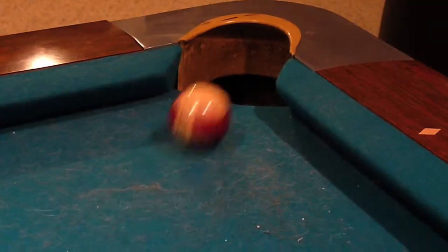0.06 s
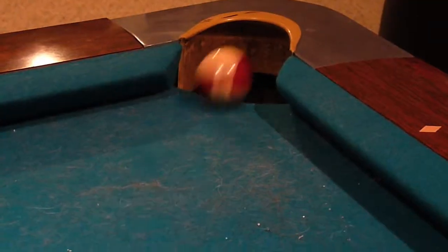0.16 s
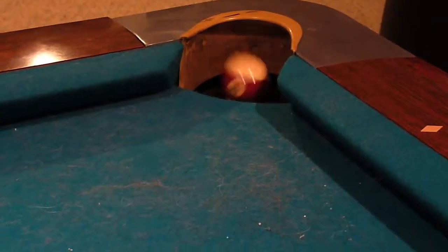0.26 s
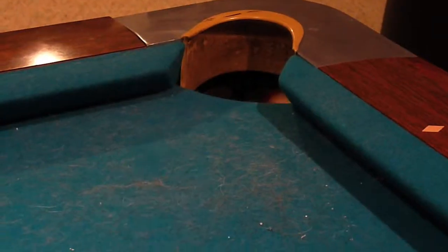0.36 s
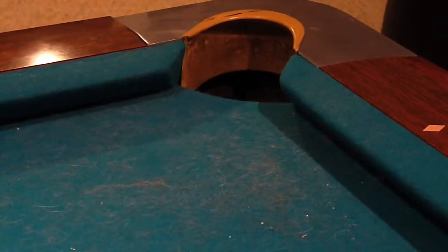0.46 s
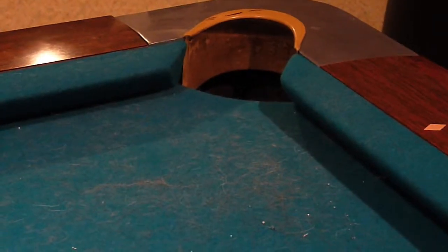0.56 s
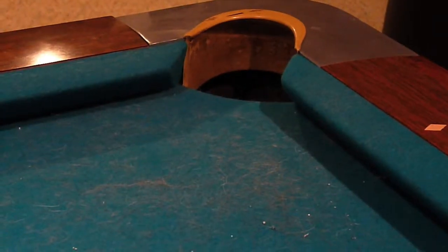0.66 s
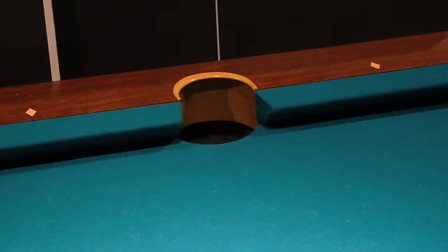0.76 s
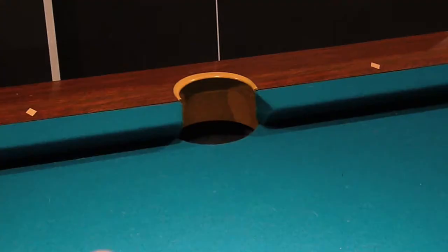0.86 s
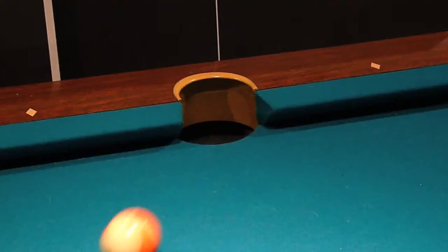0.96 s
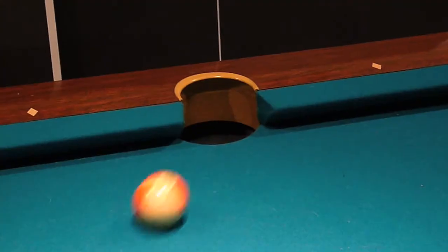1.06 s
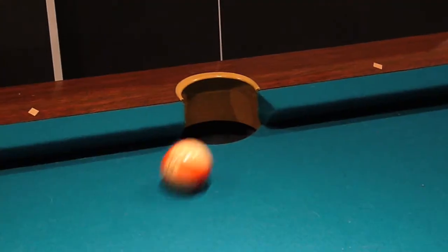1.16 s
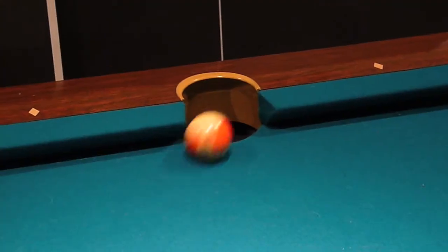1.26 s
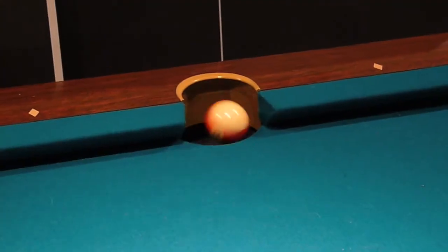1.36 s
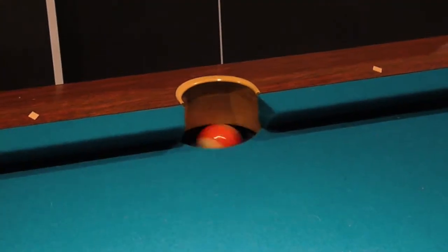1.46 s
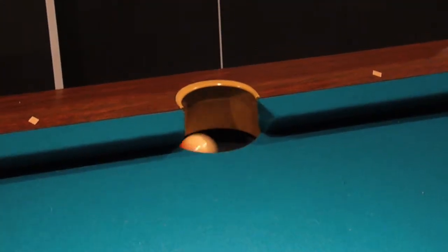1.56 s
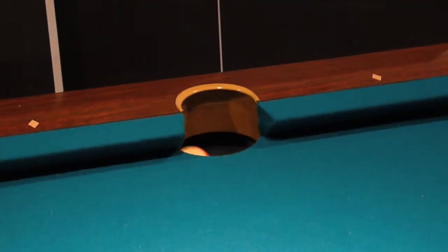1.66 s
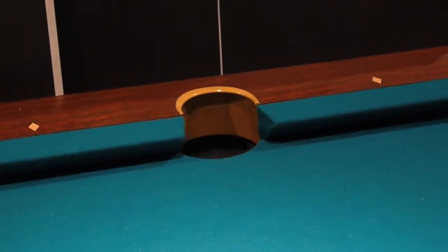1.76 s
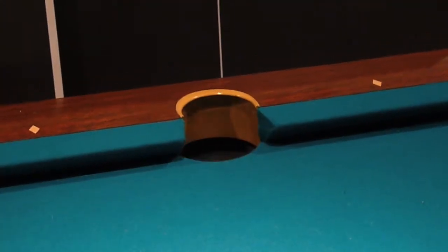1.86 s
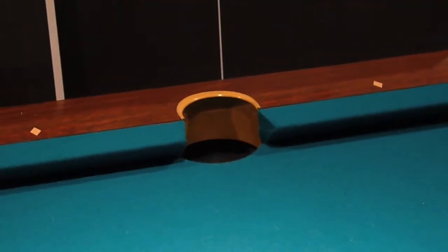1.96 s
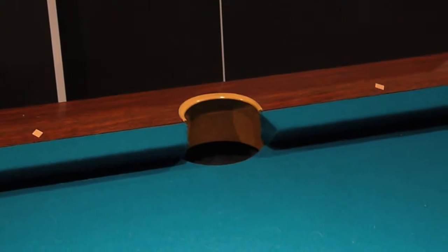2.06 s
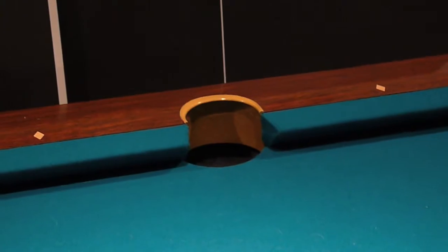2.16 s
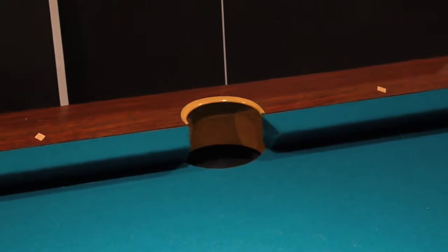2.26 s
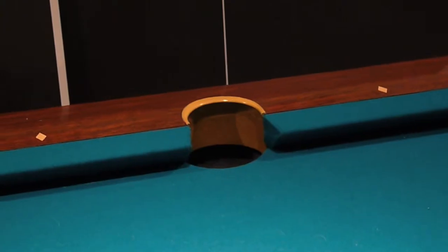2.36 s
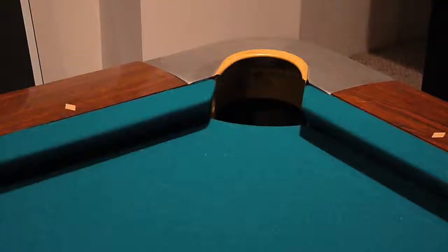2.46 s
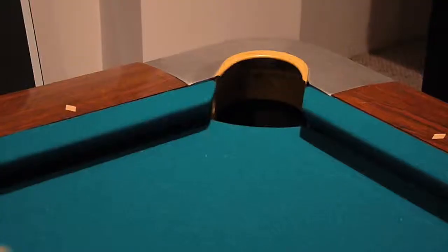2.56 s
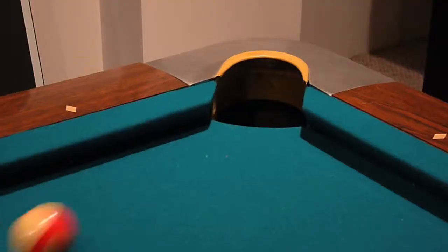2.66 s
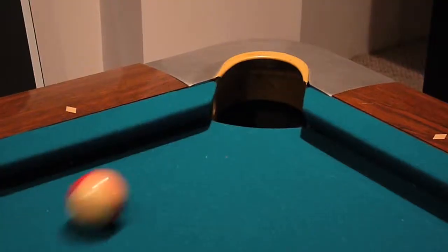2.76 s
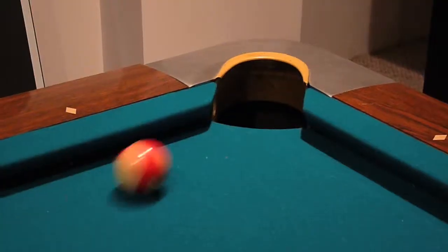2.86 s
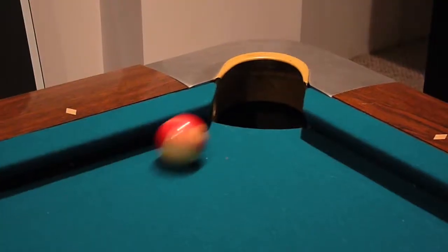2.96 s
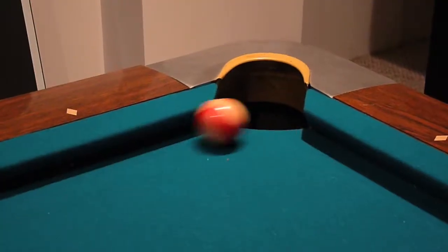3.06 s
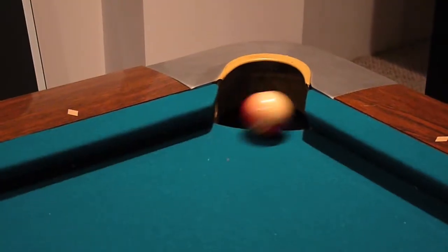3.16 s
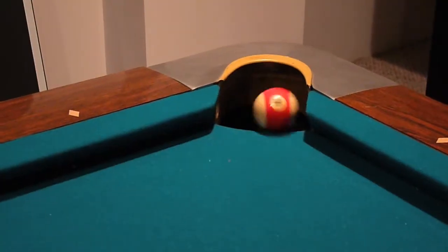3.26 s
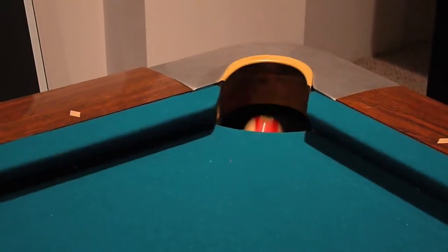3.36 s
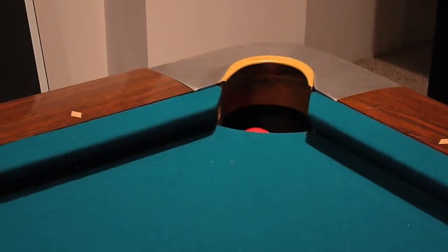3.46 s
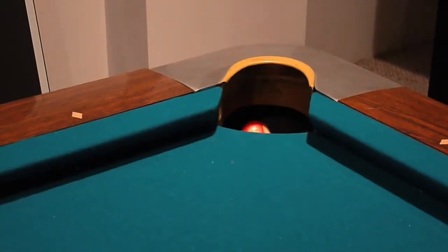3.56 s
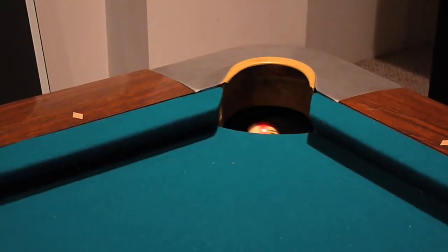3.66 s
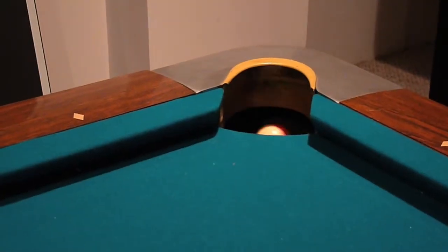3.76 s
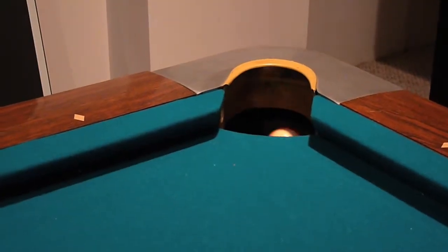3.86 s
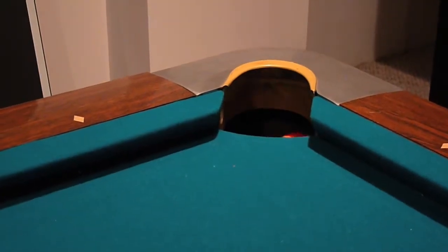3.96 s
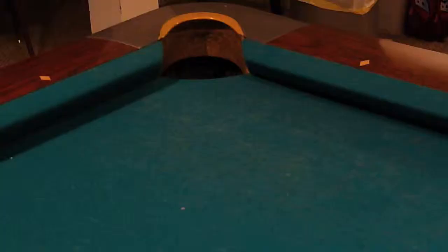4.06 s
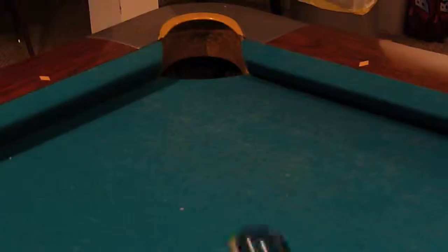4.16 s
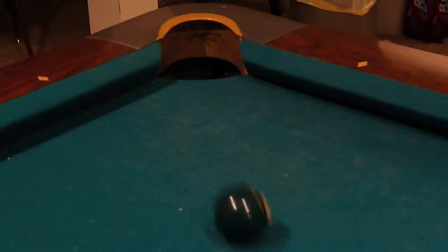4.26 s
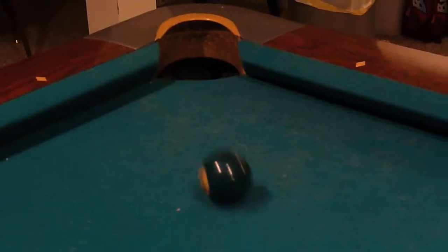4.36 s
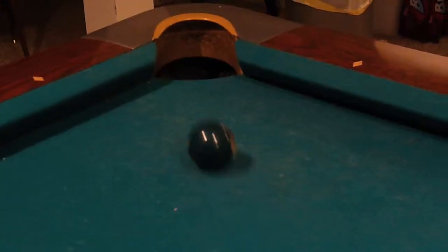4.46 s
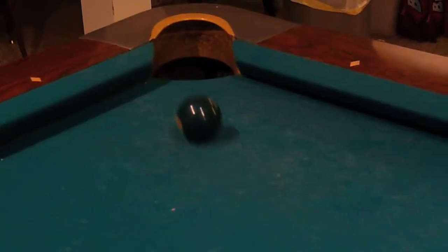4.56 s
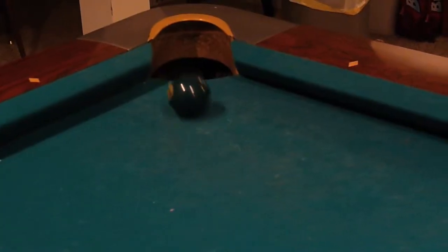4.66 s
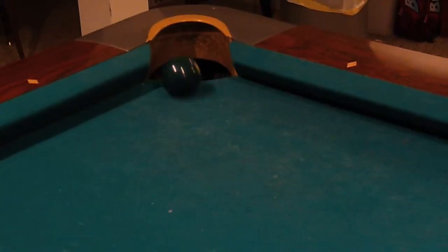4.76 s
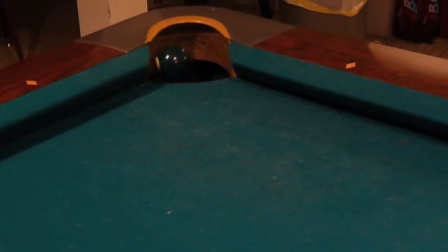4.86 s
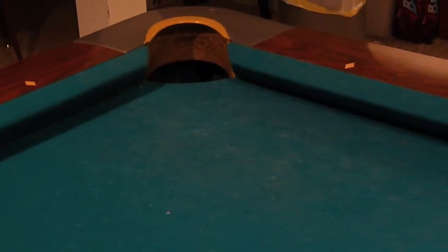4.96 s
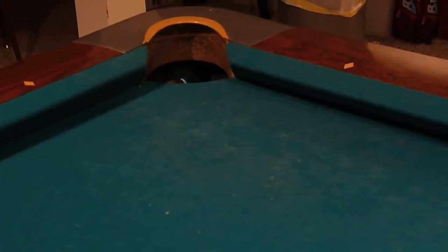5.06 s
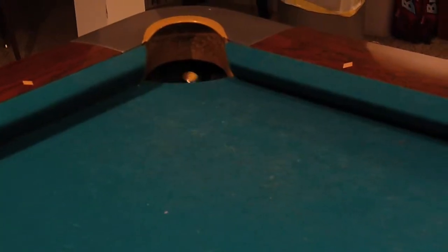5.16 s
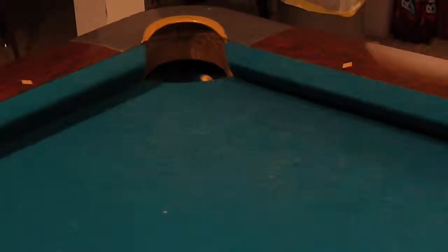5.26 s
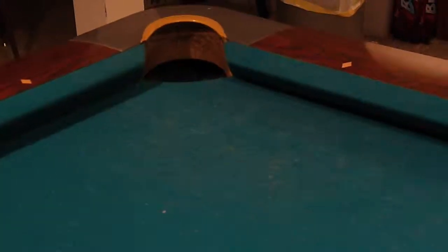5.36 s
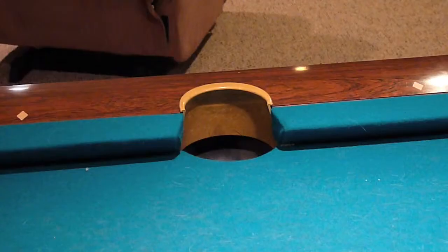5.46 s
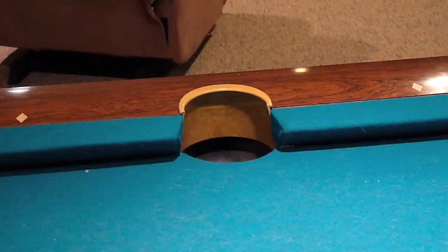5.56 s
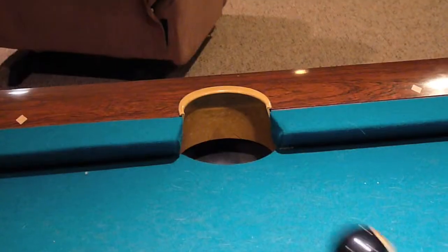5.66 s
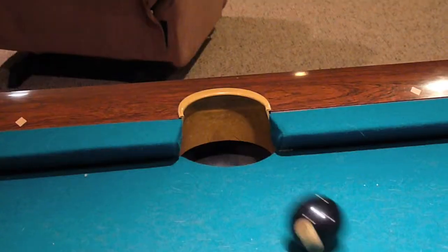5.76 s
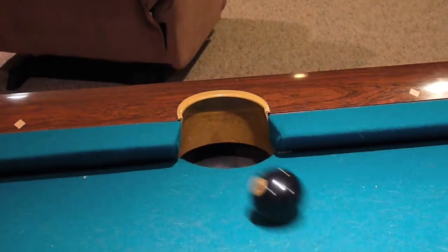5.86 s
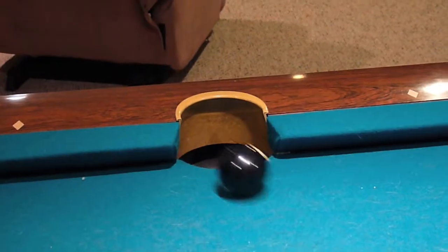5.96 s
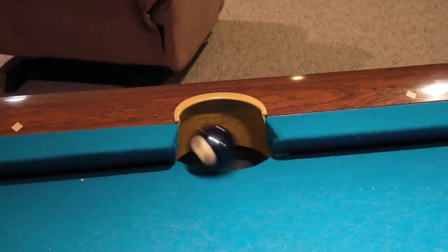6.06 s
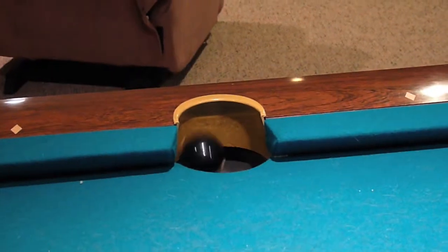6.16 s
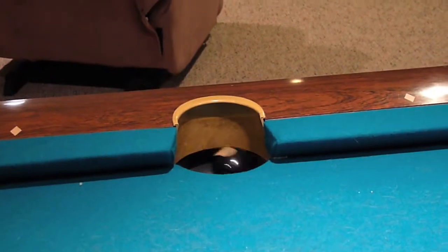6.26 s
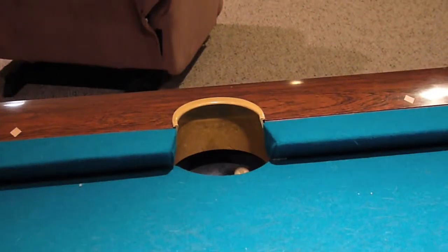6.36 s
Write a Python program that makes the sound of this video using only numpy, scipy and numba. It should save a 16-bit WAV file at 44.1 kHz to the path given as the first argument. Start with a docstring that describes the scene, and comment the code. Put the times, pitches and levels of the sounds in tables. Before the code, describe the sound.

Pool balls roll over cloth and drop into pockets one after another, knocking and clattering with hollow wooden booms.

```python
"""A pool table in a small, humming room, one microphone close to the pocket: five shots joined by fades.
In each, a ball rumbles nearer over the cloth, drops in and knocks about against the liner and other
balls while the table booms. The first drops almost at once; the second shot brings two runs.
The third and fourth land with the hardest snaps, near 3.4 s and 5 s, and the small recorder's limiter
flattens the loudest blows. The last ball drops just before the end."""
import sys
import numpy as np
from scipy import signal
from scipy.fft import irfft
from scipy.io import wavfile
from scipy.ndimage import uniform_filter1d
from numba import njit

SR = 44100
rng = np.random.default_rng(int(sys.argv[2]) if len(sys.argv) > 2 else 0)


def store_pcm(level_fs):
    """Save levels as 16-bit WAV."""
    pcm = np.round(np.clip(level_fs, -1, 1) * 32767).astype(np.int16)
    wavfile.write(sys.argv[1], SR, np.atleast_2d(pcm).T)


N = 282681
TIME = np.arange(N) / SR
AGE = TIME[:SR]  # seconds since a blow
# where one shot ends and the next begins: time_s
SHOT_JOINS = [0.851, 2.551, 4.153, 5.517]


def knocks(hard_clack_db=-17.5, hard_tick_db=-46.5, tick_growth=.8):
    """A ball strikes pocket, cushion or frame and all the woodwork sounds; harder clacks tick louder."""
    # blows of the ball: start_s, ring_db, favoured_hz, clack_db, thud_db
    blows = [ (0.211, -51.5, 210, -80.5, -54), (0.362, -10, 391, -21.5, -30), (0.410, -13, 428, -27, -60),
             (0.456, -20.5, 194, -41, -65), (0.488, -24.5, 185, -37, -36), (0.5389, -24.5, 490, -16.5, -44),
             (0.566, -12, 485, -20.5, -52.5), (0.642, -18.5, 380, -24.5, -43),
             (0.660, -16, 348, -23.5, -35.5), (0.708, -13.5, 290, -40, -60), (0.7253, -17, 447, -28, -33.5),
             (1.485, -19, 248, -14.5, -31), (1.529, -21, 272, -25.5, -55.5), (1.554, -24, 261, -35, -22.5),
             (1.6858, -43, 92, -29.5, -29.5), (1.719, -31.5, 99.8, -37, -39.5),
             (1.9858, -23.5, 257, -18, -55.5), (2.0989, -13, 285, -20, -42.5),
             (2.405, -25.5, 300, -22, -24), (2.45, -27, 308, -30.5, -33), (2.629, -50, 177, -74.5, -69),
             (2.819, -49.5, 184.5, -75, -50), (3.272, -25, 210, -65, -34.5), (3.4498, -7, 344.4, -18, -36),
             (3.520, -14.5, 440, -62, -21), (3.634, -18.5, 437, -17, -30), (4.097, -30, 442, -65, -73),
             (5.035, -8.5, 292, -14.5, -22), (5.117, -20, 280, -33, -27.5), (5.165, -16.5, 397, -22, -29),
             (5.208, -17, 296, -31, -24.5), (5.288, -27.5, 198, -64, -58),
             (5.548, -45.5, 196.5, -78, -39.5), (5.866, -45.5, 420, -76, -87),
             (6.2443, -41, 500, -25, -25.5), (6.2676, -15.5, 208, -18.5, -20.5),
             (6.318, -21.5, 392, -23, -44), (6.357, -22, 224, -66, -37), ]
    # modes of the pocket and the wood round it, one table a shot: pitch_hz, relative_db, t60_s
    pocket_modes = [
        [(162.5, -2.5, 0.44), (258, 4.5, 0.094), (330.7, -0.5, 0.28), (416.6, -9.5, 0.34), (482.6, 1.5, 0.11),
         (538.3, 0.5, 0.17), (594.5, 7, 0.092), (660, -4, 0.047), (773, -26, 0.12), (850, -32.5, 0.25)],
        [(73.5, -11, 0.13), (152, -3, 0.34), (209.3, -3.5, 0.5), (248.3, -12, 0.62), (291, -2, 0.36),
         (413.4, -9.5, .4), (451, 3.5, 0.21), (494, -13, 0.62), (546, 4.5, 0.13), (711, -10, 0.076),
         (840, -4, 0.16), (1150, -23.5, 0.14), (1390, -28.5, 0.18)],
        [(117.5, -3.5, 0.087), (175, -6, 0.52), (227.3, -5, 0.38), (287.3, -10, 0.47), (356, -3, 0.05),
         (390.8, -6.5, 0.21), (408.5, -6.5, 0.25), (507.3, -4.5, 0.078), (590, -8.5, 0.26), (638, -16, 0.088),
         (926, -22.5, 0.27), (1281, -45, 0.54)],
        [(167.7, -9.5, 0.46), (213.6, 3.5, 0.16), (284, -6, 0.11), (305, -8.5, 0.25), (414.2, -3.5, 0.34),
         (482, -6, 0.28), (509, -0.5, 0.18), (556, 4.5, 0.06), (768, -3.5, 0.15), (1250, -28, 0.23),
         (1250, -19, 0.17), (1360, -15, 0.26), (1500, -14, 0.14), (1630, -18, 0.17)],
        [(162.2, 6, 0.3), (218, -7.5, 0.34), (328, -3, 1), (365.4, 3.5, 0.3), (410, 7.5, 0.11), (454, 6, 0.12),
         (568.4, -1, 0.48), (725, 4.5, 0.1), (983, -9, 0.27)],
    ]
    # the pocket's liner, one value a shot: pitch_hz
    liner_hz = [1127, 824.6, 964, 903, 858]
    out = np.zeros(N)
    for start, ring_db, favoured_hz, clack_db, thud_db in blows:
        shot = np.searchsorted(SHOT_JOINS, start)
        thud = undb(thud_db) * table_thud()
        ring = undb(ring_db) * pocket_ring(pocket_modes[shot], favoured_hz, clack_db - ring_db)
        clack = undb(clack_db) * liner_clack(liner_hz[shot])
        tick = undb(hard_tick_db + tick_growth * (clack_db - hard_clack_db)) * contact_tick()
        add(out, start, thud + ring + clack + tick)
    return out


def pocket_ring(modes, favoured_hz, hardness_db, favour_db=13, reach_octaves=0.3, usual_db=-6):
    """The spot where the ball lands favours some pocket modes; only a hard blow wakes the high ones."""
    hz, db, t60 = np.transpose(modes)
    excess_db = hardness_db - usual_db
    spot_db = favour_db * np.exp(-.5 * (np.log2(hz / favoured_hz) / reach_octaves) ** 2)
    treble_db = 0.5 * excess_db * np.clip(np.log2(hz / 560), 0, 1)
    # a soft bump gives a clear low note, a hard one stirs the whole cabinet
    cabinet_db = -10 + 0.17 * np.minimum(excess_db, 0)
    cabinet = undb(cabinet_db) * wash(hz=0.97 * favoured_hz, octaves=0.64, t60=0.42)
    return (ringing(hz, db + spot_db + treble_db, t60) + cabinet) * rise(seconds=0.0022)


def liner_clack(hz, room_db=-11, wall_db=-17):
    """The stiff liner rings briefly; the cabinet and the room carry the clack on."""
    # modes of the liner: pitch_ratio, relative_db, t60_s
    liner_modes = [(.79, -6.5, 0.13), (1.001, 5, 0.025), (1.17, -2, 0.038), (1.431, -17.5, 0.05),
                   (1.951, -15, 0.03)]
    ratio, db, t60 = np.transpose(liner_modes)
    tail = undb(room_db) * wash(hz=0.73 * hz, octaves=0.63, t60=0.29)
    tail += undb(wall_db) * wash(hz=1290, octaves=0.36, t60=0.11)
    return ringing(hz * ratio, db, t60) * rise(seconds=0.00064) + tail * rise(seconds=0.011)


def table_thud():
    """The heavy frame answers late, with a low, lingering boom."""
    return wash(hz=158, octaves=0.89, t60=0.42) * rise(seconds=0.019)


def contact_tick(gain_db=3, room_db=-12):
    """Hard resin touches for a moment and rings the pocket's mouth; a faint bright echo follows."""
    # bright modes of the pocket's mouth: pitch_hz, relative_db, t60_s
    mouth_modes = [(1604, 4.5, 0.12), (1960, 6.5, 0.028), (2318, -2.5, 0.034), (2430, -11.5, 0.013),
                   (3320, -12, 0.024), (3590, -12, 0.012), (3950, -23, 0.011)]
    echo = undb(room_db) * wash(hz=2050, octaves=0.39, t60=0.27)
    mouth = ringing(*np.transpose(mouth_modes))
    return undb(gain_db) * (mouth + echo) * rise(seconds=0.0002)


def snaps(cycles=4, overtone_ratio=2.5, overtone_db=-11):
    """A square hit throws out a steep swing of pressure with a bright edge and rings the pocket's mouth."""
    # square hits: start_s, push_db, push_hz, crack_db, mouth_db
    square_hits = [ (0.3643, -9.5, 1180, -53, -40.5), (0.5403, -1.5, 1010, -50, -30.5),
                   (0.6444, -21, 1370, -43.5, -40.5), (3.4498, 8, 540, -15, -39),
                   (5.0349, 6, 1290, -21, -36), ]
    out = np.zeros(N)
    for start, push_db, hz, crack_db, mouth_db in square_hits:
        phase = 2 * np.pi * hz * AGE
        swing = np.sin(phase) + undb(overtone_db) * np.sin(overtone_ratio * phase)
        push = -swing * decay(t60=cycles / hz) * rise(seconds=0.00088)
        crack = wash(hz=3900, octaves=0.6, t60=0.0027) * rise(seconds=0.00016)
        add(out, start, undb(push_db) * push + undb(crack_db) * crack + undb(mouth_db) * contact_tick())
    return out


def ball_clicks(room_db=-17):
    """Ball meets ball deep in the pocket: a small dry click that leaves the wood at rest."""
    # ball against ball: start_s, level_db, pitch_hz
    contacts = [(0.6429, -27.5, 2340), (0.663, -52, 2900), (0.7256, -44, 2240), (1.542, -42.5, 2000),
                (2.4065, -32.5, 1540), (3.532, -53, 2650), (3.6365, -47.5, 2470), (5.1645, -30.5, 2470),
                (5.243, -41.5, 2450), (5.288, -47.5, 2400), (6.268, -42, 2800)]
    out = np.zeros(N)
    for start, db, hz in contacts:
        click = wash(hz=hz, octaves=0.22, t60=0.023)
        echo = undb(room_db) * wash(hz=0.85 * hz, octaves=0.37, t60=0.23)
        add(out, start, undb(db) * (click + echo) * rise(seconds=0.00053))
    return out


def rolling(cloth_db=-66, bump_depth_db=1.0, bump_hz=14):
    """Balls rumble on the bed and swish over the cloth, louder as they near, wavering with small bumps."""
    # runs towards the microphone, over the cloth or under the table: start_s, arrival_s, rumble_db
    runs = [(0, .36, -47.5), (0.88, 1.48, -47.5), (1.6, 2.5, -44), (2.59, 3.27, -60), (4.153, 5.03, -57),
            (5.53, 6.25, -57.5)]
    # spectrum of the rumble: frequency_hz, relative_db
    rumble_spectrum = [(40, -24), (70, 0.5), (95, 4), (130, -4.5), (170, 5), (230, -3), (320, -1.5),
                       (550, -12.5), (900, -22.5), (1800, -43), (4000, -45)]
    # spectrum of the nap's swish: frequency_hz, relative_db
    cloth_spectrum = [(200, -14.5), (450, 1), (850, 3), (1300, -11.5), (3000, -36.5)]
    bumps = noise(lambda octave: 1 / (1 + (2 ** octave / bump_hz) ** 2), size=N)
    rumble_gain = sum(undb(db) * approach(start, arrival, db_per_s=7.5) for start, arrival, db in runs)
    swish_gain = undb(cloth_db) * sum(approach(start, arrival, db_per_s=16.5) for start, arrival, _ in runs)
    rumble = coloured(rumble_spectrum) * rumble_gain
    swish = coloured(cloth_spectrum) * swish_gain
    return (rumble + swish) * undb(-bump_depth_db * bumps)


def approach(start, arrival, db_per_s, onset_s=0.017, stop_s=.03):
    """Gain of one run: it swells steadily to 1 as the ball nears the microphone, then dies away."""
    onset = np.clip((TIME - start) / onset_s, 0, 1)
    swell = undb(-db_per_s * np.maximum(arrival - TIME, 0))
    dying = np.exp(-np.maximum(TIME - arrival, 0) / stop_s)
    return onset * swell * dying


def room_hum(air_db=-60):
    """Ventilation behind the table: a soft rush with a few low tones."""
    # steady tones: pitch_hz, level_db
    hum_tones = [(97, -69), (120, -70), (178, -79.5), (313, -70), (398, -73.5)]
    # spectrum of the rush: frequency_hz, relative_db
    air_spectrum = [(25, -7.5), (50, -4.5), (90, -2), (180, -4), (330, -9.5), (420, -11), (520, -0.5),
                    (660, -14.5), (830, -10), (1020, -19), (2000, -23.5), (5000, -35)]
    hum = sum(undb(db) * np.sqrt(2) * np.sin(2 * np.pi * (hz * TIME + rng.random())) for hz, db in hum_tones)
    return undb(air_db) * coloured(air_spectrum) + hum


def ringing(hz, db, t60, scatter_db=1.35, detune=0.0074):
    """Decaying modes that together start at rms 1, a little different on every blow."""
    chance = rng.standard_normal((len(hz), 2))
    gain = undb(db + scatter_db * chance[:, 0])
    gain = gain * np.sqrt(2 / np.sum(gain ** 2))
    hz = hz * (1 + detune * chance[:, 1])
    return sum(g * np.sin(2 * np.pi * (f * AGE + rng.random())) * decay(t) for f, g, t in zip(hz, gain, t60))


def wash(hz, octaves, t60):
    """Countless close resonances round one pitch, dying away together."""
    band = noise(lambda octave: np.exp(-.5 * ((octave - np.log2(hz)) / octaves) ** 2), size=SR)
    power = uniform_filter1d(band ** 2, size=2048, mode="wrap")
    return band / np.sqrt(power) * decay(t60)


def coloured(points):
    """Steady noise with a spectrum drawn through points of frequency_hz, relative_db."""
    hz, db = np.transpose(points)
    return noise(lambda octave: undb(np.interp(octave, np.log2(hz), db)), size=N)


def noise(gain_at, size):
    """Noise of rms 1 whose spectrum follows a function of log2 frequency."""
    octave = np.log2(np.maximum(np.fft.rfftfreq(size, 1 / SR), 1))
    y = irfft(gain_at(octave) * np.exp(2j * np.pi * rng.random(len(octave))), size)
    return y / y.std()


def rise(seconds):
    """Soft onset of a blow."""
    return 1 - np.exp(-AGE / seconds)


def decay(t60):
    """Free decay after a blow, 60 dB in t60 seconds."""
    return np.exp(-np.log(1000) * AGE / t60)


def undb(db):
    """Decibels to gain."""
    return 10 ** (np.asarray(db) / 20)


def add(track, start, sound):
    """Lay a sound into a track at a time in seconds."""
    i = int(start * SR)
    track[i:i + len(sound)] += sound[:N - i]


def limiter(x, threshold_db=-14, attack_s=0.00046, release_s=0.034, lag_s=0.0006):
    """Holds loud sound at one level; it reacts late, so the first swing of a blow slips through."""
    peak = follow_peak(x, 1 / (attack_s * SR), 1 / (release_s * SR))
    late_peak = np.interp(TIME - lag_s, TIME, peak)
    return x / np.maximum(late_peak / undb(threshold_db), 1)


@njit
def follow_peak(x, attack, release):
    """Peak follower that rises fast and falls slowly."""
    out, level = np.empty(len(x)), 0.
    for i in range(len(x)):
        level += (abs(x[i]) - level) * (attack if abs(x[i]) > level else release)
        out[i] = level
    return out


def scene():
    """Pocket, table and room at one microphone, close to the pocket."""
    return (knocks() + snaps() + ball_clicks() + rolling() + room_hum())[None]


def record(dry, ceiling=.6, hiss_db=-69, whine_hz=6666, whine_db=-89, offset=-0.0046, fade_s=0.092):
    """A small recorder: limiter, overload, its own hiss, whine and offset, and a narrow band; the sound fades
    through silence where one shot gives way to the next."""
    # spectrum of the recorder's hiss: frequency_hz, relative_db
    hiss_spectrum = [(200, 1), (1500, 3), (2500, -0.5), (4000, 0), (5400, -1), (6200, -0.5), (7000, -4.5),
                     (7600, -22.5), (9000, -46)]
    held = limiter(dry[0])
    overloaded = held / (1 + (held / ceiling) ** 6) ** (1 / 6)
    hiss = undb(hiss_db) * coloured(hiss_spectrum)
    whine = undb(whine_db) * np.sqrt(2) * np.sin(2 * np.pi * whine_hz * TIME)
    to_join_s = np.min(np.abs(TIME - np.array(SHOT_JOINS)[:, None]), axis=0)
    fade = np.minimum(to_join_s / fade_s, 1)
    lowpass = signal.ellip(8, .2, 70, 7400, fs=SR, output="sos")  # steep above 7400 Hz
    return signal.sosfilt(lowpass, (overloaded + hiss + whine + offset) * fade)[None]


dry = scene()
out = record(dry)
store_pcm(out)
```